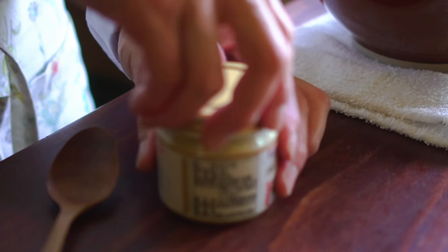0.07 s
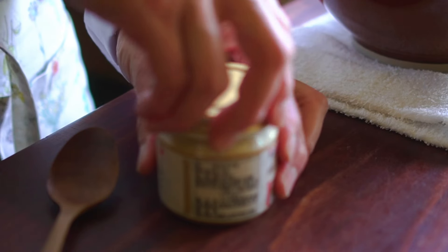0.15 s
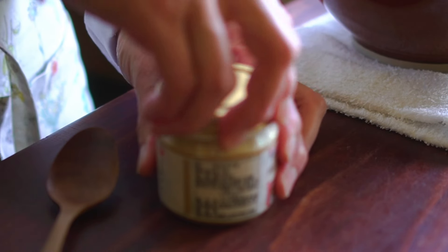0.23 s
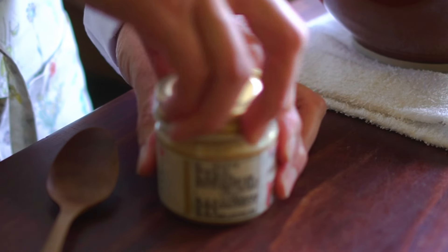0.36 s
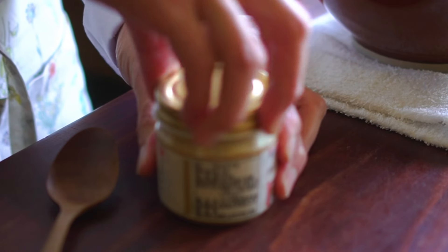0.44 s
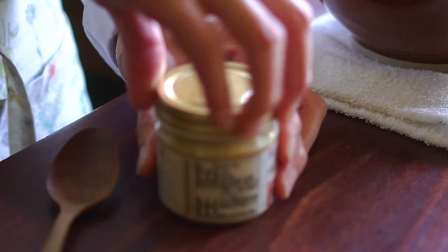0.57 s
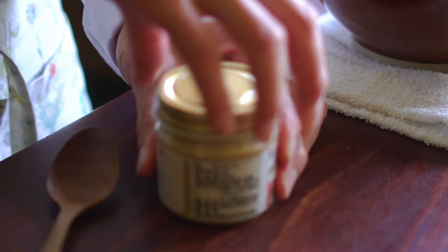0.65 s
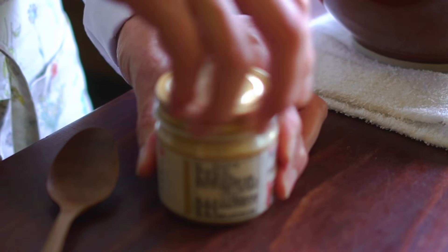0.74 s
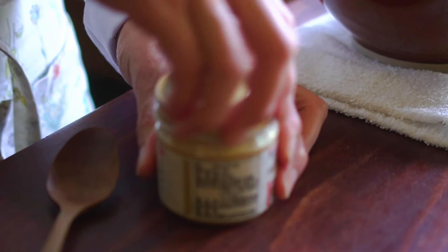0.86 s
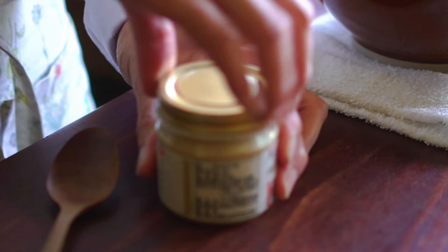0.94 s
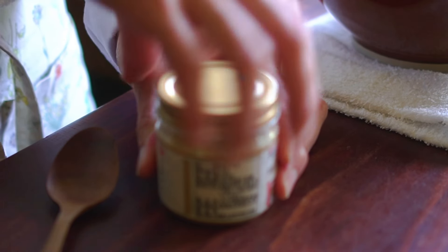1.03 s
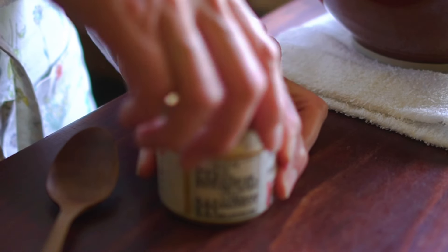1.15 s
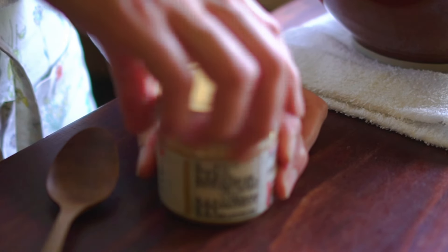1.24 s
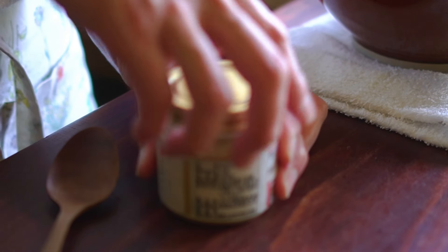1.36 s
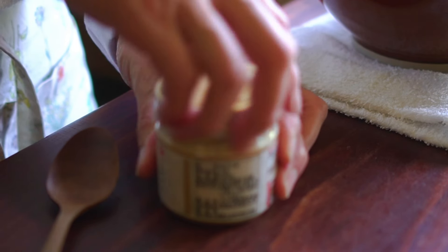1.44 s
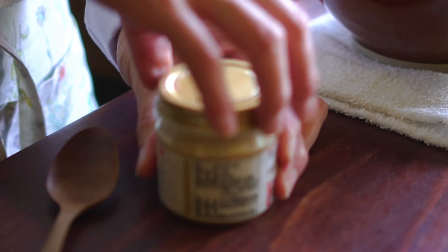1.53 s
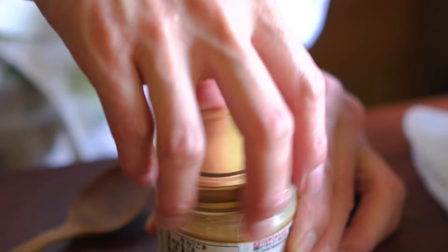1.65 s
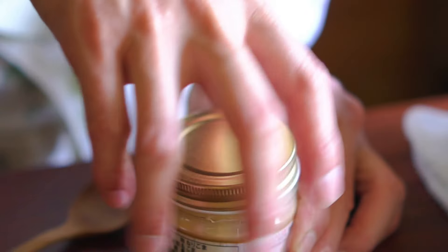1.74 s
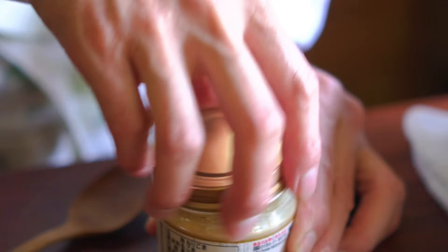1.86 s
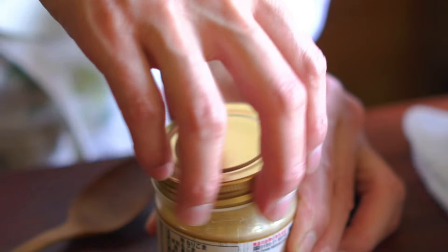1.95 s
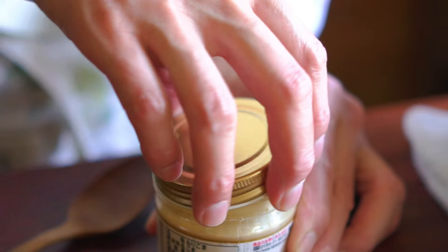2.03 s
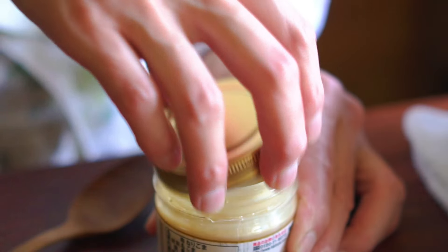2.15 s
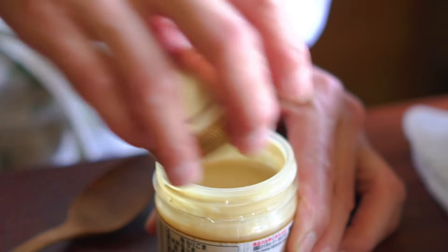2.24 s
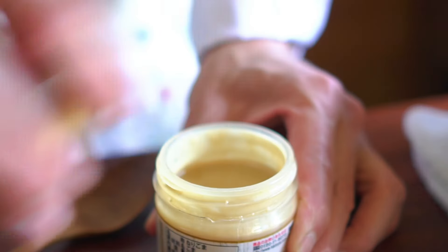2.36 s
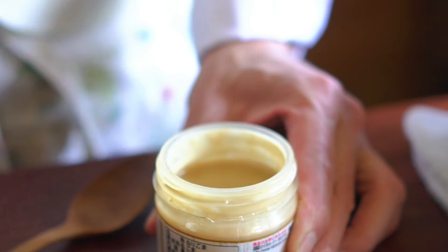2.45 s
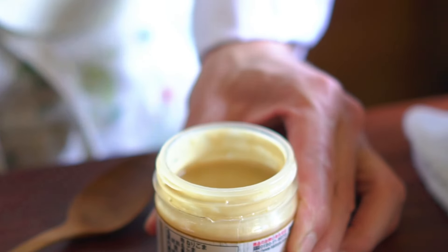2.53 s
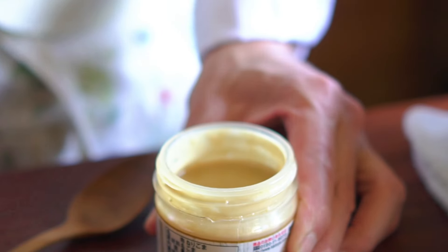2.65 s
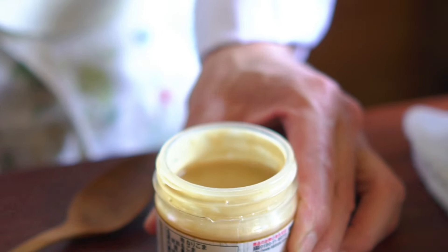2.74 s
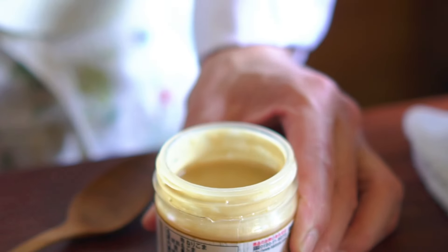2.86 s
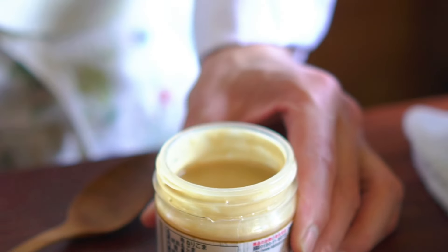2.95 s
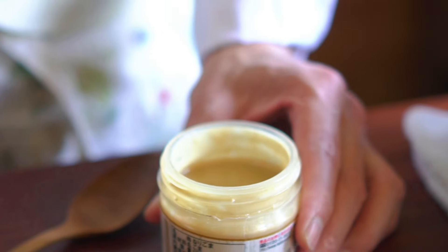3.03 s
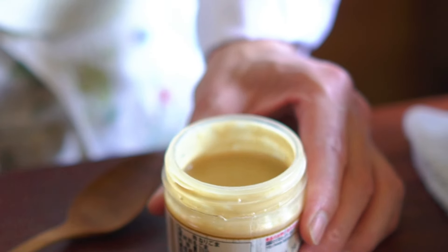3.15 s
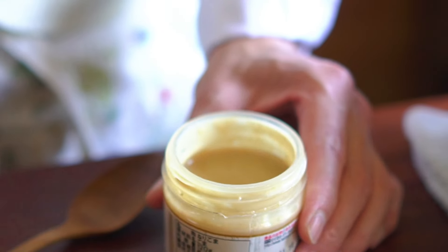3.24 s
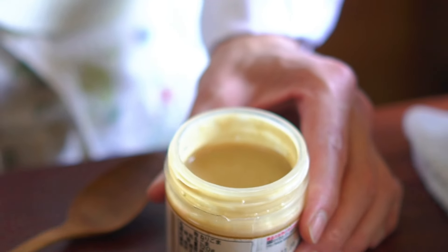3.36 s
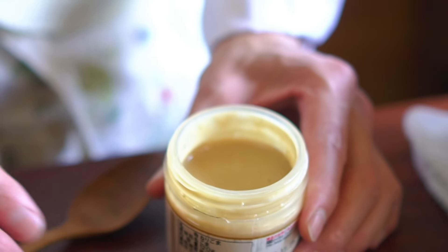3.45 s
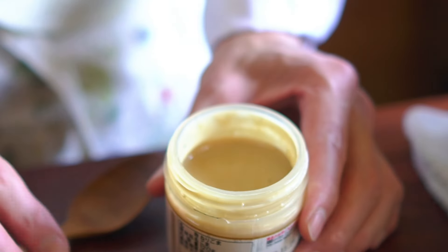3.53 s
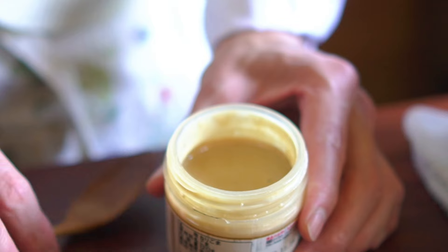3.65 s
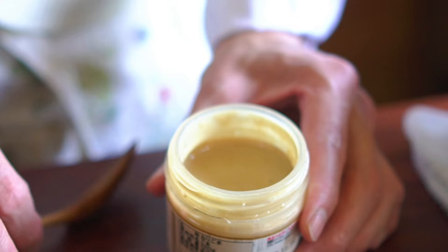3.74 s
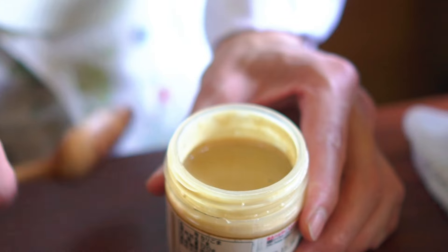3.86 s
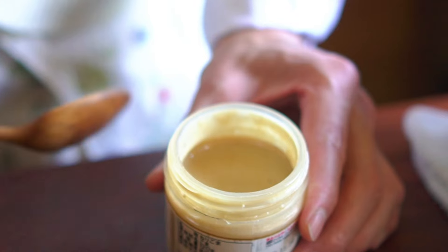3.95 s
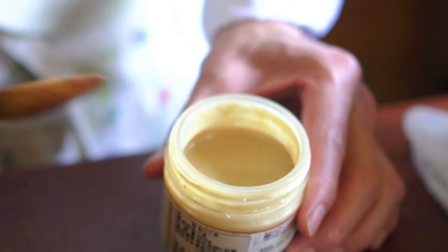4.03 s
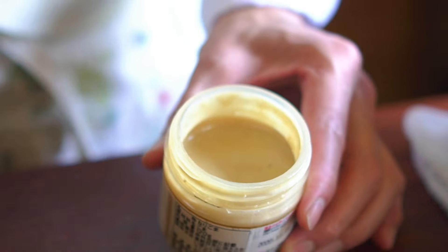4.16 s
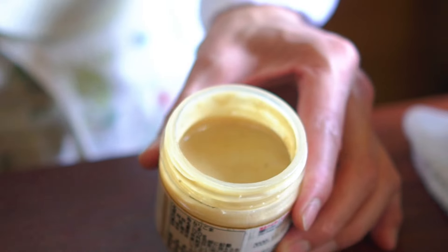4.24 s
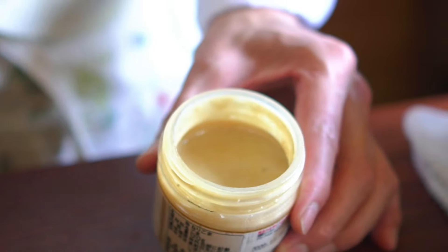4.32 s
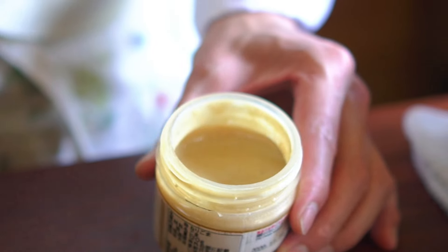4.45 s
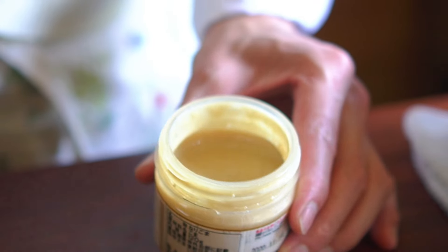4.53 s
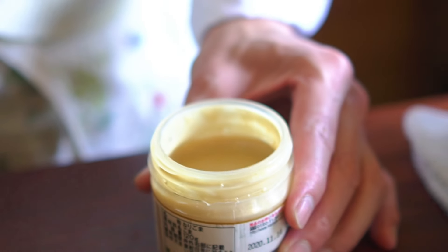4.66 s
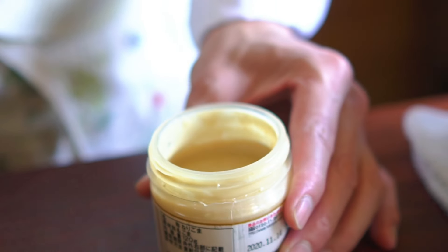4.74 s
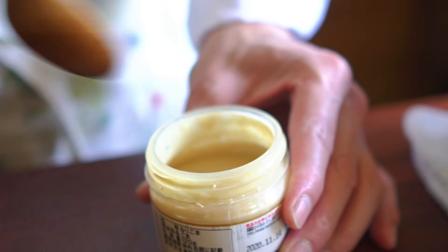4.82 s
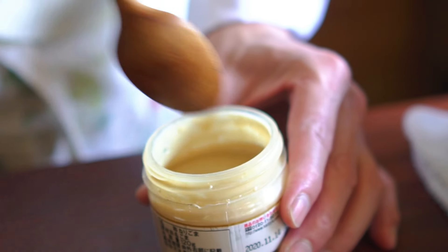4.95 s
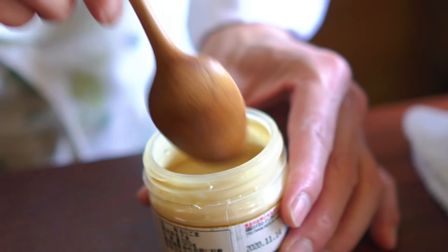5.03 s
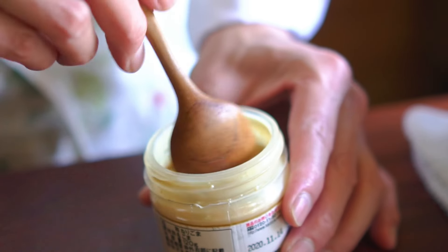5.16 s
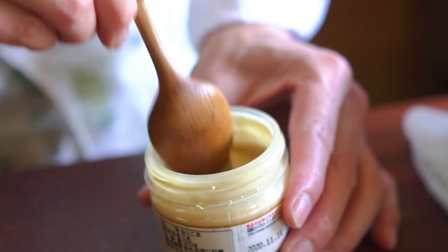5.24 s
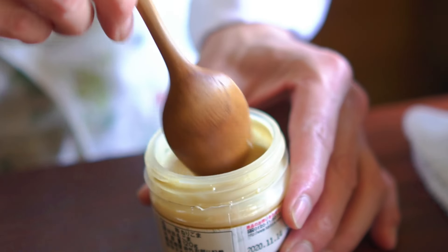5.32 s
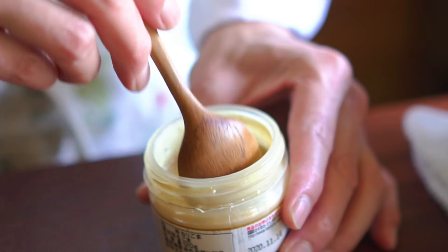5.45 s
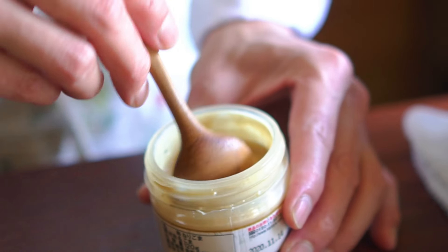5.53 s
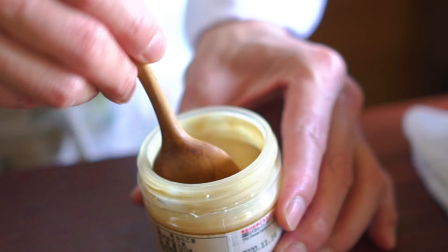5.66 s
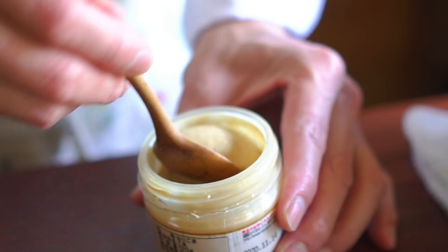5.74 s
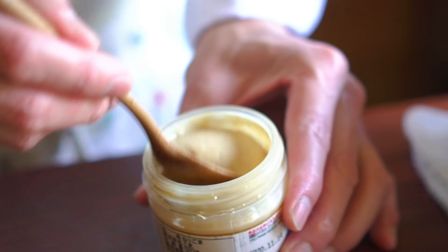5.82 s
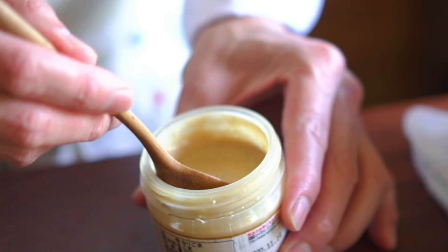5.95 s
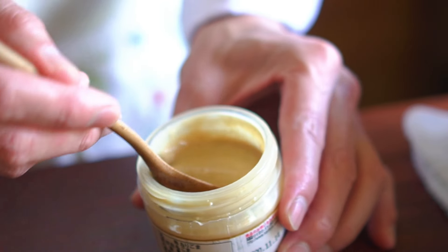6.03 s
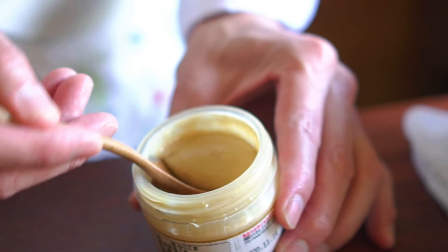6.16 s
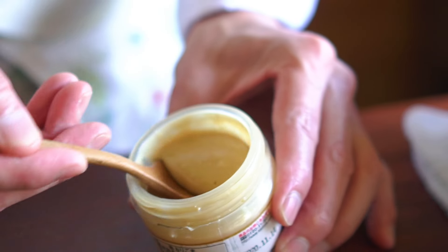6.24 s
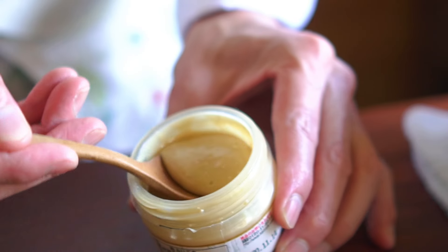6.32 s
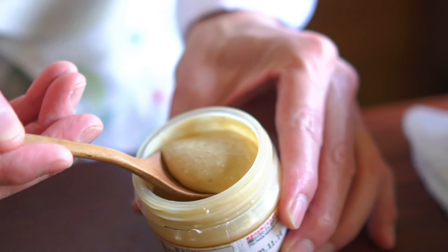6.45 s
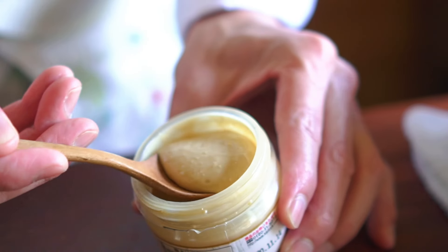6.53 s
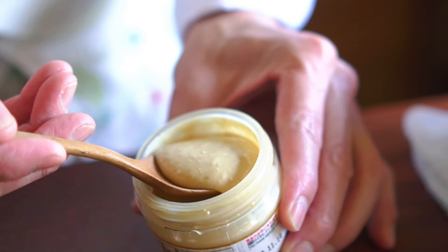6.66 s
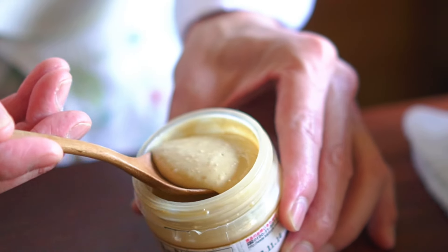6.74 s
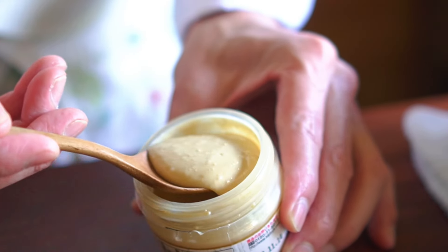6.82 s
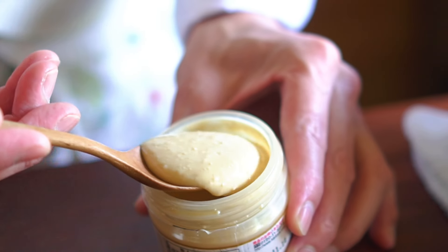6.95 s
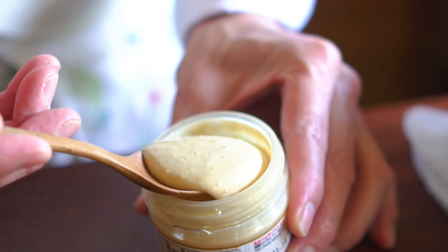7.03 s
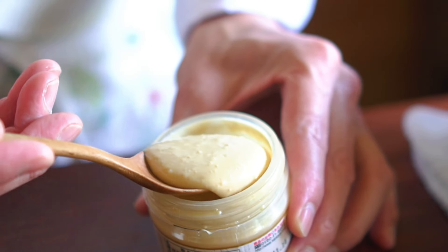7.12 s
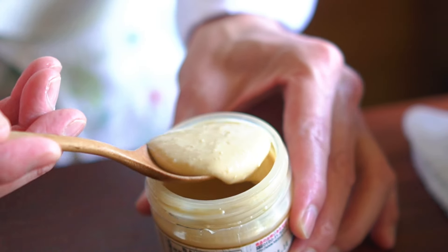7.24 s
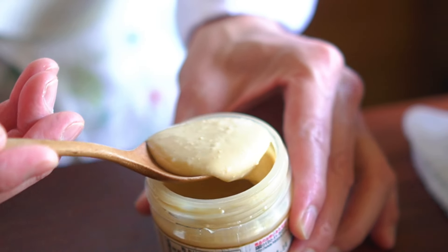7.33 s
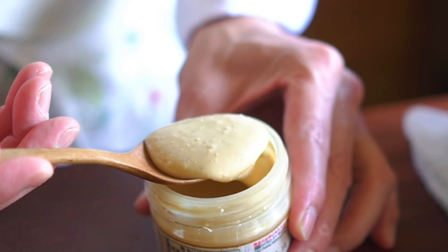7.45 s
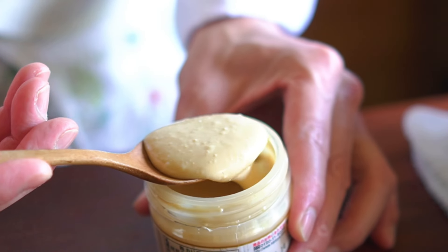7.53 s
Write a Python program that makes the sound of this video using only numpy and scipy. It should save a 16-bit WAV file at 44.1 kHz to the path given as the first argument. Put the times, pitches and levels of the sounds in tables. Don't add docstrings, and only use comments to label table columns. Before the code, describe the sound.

Dry, scratchy lid twisting, a brief gap, a hollow pop, a loud metallic lid drop rattling on the table, then faint wooden spoon rubbing.

```python
import sys
import numpy as np
from scipy import signal
from scipy.fft import rfft, irfft
from scipy.io import wavfile
from scipy.ndimage import uniform_filter1d

SR = 44100
rng = np.random.default_rng(int(sys.argv[2]) if len(sys.argv) > 2 else 0)


def to_linear_factor(level_db):
    exponent = np.asarray(level_db, float) / 20
    return 10 ** exponent


def dump(signal):
    limited = np.clip(np.atleast_2d(signal).T, -1, 1)
    pcm = np.round(limited * 32767).astype(np.int16)
    wavfile.write(sys.argv[1], SR, pcm)


N = 334489
TIME = np.arange(N) / SR

# [f/Hz, density/dB]
AIR_SPECTRUM = [(82, -28.5), (140, -11.5), (208, -3), (249, -1.5), (408, -14.5), (921, -25.5),
                (3550, -40.5), (3920, -37), (4970, -32), (8320, -36), (9750, -31.5), (11700, -36.5),
                (13900, -35.5), (14800, -35), (16000, -63.5)]
AIR_DB = -59.5
# [f/Hz, level/dB]
WHINE_LINES = [(7127, -83), (14250, -84)]
# [f/Hz, t60/s]
KITCHEN_T60 = [(250, 0.37), (660, 0.29), (1740, 0.35), (4600, 0.34), (12000, 0.29)]
# [t opening/s, shut/s, closing time/s,
# level/dB]
HUSHES = [(2.886, 0.11, .025, -10), (.15, .06, 0.097, -1), (.04, .04, .01, -2), (.6, .02, 0.46, 4.5),
          (0.815, .05, 0.2, -43.5), (.88, 0.041, 0.011, -12), (1.116, 0.038, 0.078, -16.5),
          (1.168, 0.033, 0.016, -30.5), (1.66, 0.063, 0.75, 9), (2.059, 0.19, 0.045, -9),
          (3.434, .13, 0.46, -17), (5.45, 0.17, 0.028, -4.5)]
OPEN_DB, REOPEN_S = 5.5, 0.032
RUB_HUSH = 0.48
# [t start/s, t end/s, f low/Hz, f high/Hz, level/dB]
BAND_HOLES = [
    (.73, .817, 886, 3300, -18),
    (0.824, 0.89, 1500, 3300, -16),
    (1.917, 2.064, 1500, 2580, -15),
]
# [t/s, level/dB]
SCENE_CHANGE = [(0, -4.5), (1.661, -2.5), (1.667, -89), (1.74, -73), (1.795, -37), (1.82, -13), (1.855, -1),
                (7.6, 2)]

# [f/Hz, width/Hz, share of clean ringing after a bump]
TABLE_MODES = [(53.37, 30, 1.2), (97.6, 43.2, 0.9)]
# [t peak/s, fall/s, low mode level/dB, upper mode level/dB]
TABLE_BUMPS = [(0.031, .06, -27, -35), (0.184, .1, -19.5, -36), (0.268, .05, -23.5, -42),
               (0.361, .1, -20, -53), (.42, .12, -25, -37.5), (0.588, .18, -32.5, -52.5),
               (0.739, .09, -39, -72), (0.841, .22, -30.5, -48.5), (1.16, .1, -29, -35),
               (1.2, .06, -26, -37), (1.31, .13, -31.5, -60), (1.479, .15, -20, -28),
               (1.665, .15, -25, -48), (1.858, .06, -10.5, -31), (1.889, .09, -11, -25),
               (2.029, .1, -32, -36.5), (2.17, .9, -41.5, -45), (2.8, .12, -36, -44),
               (2.92, .3, -23, -53.5), (3.17, .18, -33, -63.5), (3.589, .1, -27, -55), (3.7, 1.6, -38, -51),
               (6.227, 0.2, -28.5, -40), (6.95, .13, -39, -52), (7.07, .24, -32.5, -37),
               (7.52, .2, -39.5, -45)]
BUMP_RISE = 0.31
# [t/s, low mode level/dB, upper mode level/dB]
IDLE_SHAKING = [(0, -54, -58), (2.199, -54, -51), (3.4, -47, -49), (5.3, -48.5, -48), (7.6, -51, -51)]
# [f/Hz, level/dB, t60 as a share of the knock's]
PLANK_MODES = [(206.8, 2, 1), (234.7, -4, 1.9), (308.2, -2, .9), (395, -3, 0.88), (522, 2, 0.62),
               (636.5, 0.5, 0.61), (768, -6, 0.74), (910, -18, 0.21)]
# [t/s, peak level/dB, f centre/Hz, t60/s, tick level/dB]
WOOD_KNOCKS = [(1.122, -29, 237, 0.13, 1.5), (1.411, -24, 330, 0.14, -9), (1.847, -20.5, 202, 0.29, -5),
               (3.436, -27, 379, 0.24, -2), (3.705, -41.5, 690, 0.31, 0.5), (5.121, -45.5, 650, 0.18, 0.5),
               (6.0793, -36.5, 403, 0.29, 6.5), (6.128, -34.5, 480, 0.3, 4), (7.045, -30, 260, 0.26, 3.5),
               (7.473, -43, 380, 0.15, 5.5)]

# [t peak/s, fall/s, handle level/dB, skin level/dB, bowl level/dB]
SPOON_SLIDES = [(2.33, 0.54, -79, -61.5, -69), (2.438, 0.03, -58, -52.5, -42.5),
                (2.469, 0.096, -66, -76.5, -57), (3.451, 0.67, -80, -78, -68.5),
                (3.714, 0.28, -57, -71, -58.5), (3.785, 0.029, -47, -82, -63),
                (3.93, 0.035, -53.5, -47, -67.5), (3.99, 0.66, -54, -51, -64),
                (4.136, 0.22, -42.5, -39.5, -78), (4.324, 0.071, -52, -49.5, -75),
                (4.44, 0.33, -64.5, -64.5, -72.5), (4.618, 0.15, -45, -43, -68),
                (4.666, 0.0454, -42, -38, -65), (4.753, 0.23, -49.5, -40, -77),
                (4.84, .4, -59, -63.5, -73.5), (4.919, 0.078, -40.5, -30, -76), (4.98, 0.24, -61, -59, -85),
                (5.104, .03, -45, -49, -50), (5.128, 0.023, -40.5, -54, -45),
                (5.138, 0.064, -45.5, -49.5, -49), (4.432, 0.027, -55, -56, -74.5)]
SLIDE_RISE = 0.4
# [f/Hz, width/Hz, level/dB]
HANDLE_BANDS = [(6350, 300, -5.5), (7000, 720, -7.5), (8200, 1400, -0.5), (8340, 960, -3.5)]
SKIN_BANDS = [(10340, 550, -2), (11850, 900, .5), (13300, 2200, 3), (14700, 900, .5)]
BOWL_BANDS = [(2650, 350, -7), (3200, 1400, -2.5), (3530, 500, -6), (4100, 140, -6.5)]
# [t peak/s, rise/s, fall/s, level/dB]
SLEEVE = [
    (5.8, 0.64, 0.99, -62.5),
    (6.14, 0.31, 0.68, -58.5),
    (6.9, .15, 0.11, -58.5),
]
# [t/s, length/s, peak level/dB, f start/Hz, f end/Hz]
SQUEAK_GLIDES = [(3.431, 0.017, -50, 2415, 2390), (3.439, 0.066, -61.5, 2216, 2140),
                 (3.501, 0.075, -64, 2650, 2600), (4.901, 0.077, -47, 14500, 14600),
                 (6.117, 0.022, -58, 1900, 1920), (1.193, 0.1, -54, 2670, 2680),
                 (1.469, 0.11, -51, 2760, 2740), (0.552, 0.18, -44, 4550, 4360),
                 (0.842, 0.068, -44, 4400, 4740), (2.431, 0.044, -53, 2110, 2100),
                 (2.139, .03, -54.5, 4040, 4050), (2.157, .055, -51.5, 3900, 3880),
                 (2.17, 0.054, -58.5, 3000, 3020), (1.327, .022, -53.5, 1900, 1900),
                 (3.687, 0.15, -47.5, 608, 657), (3.698, 0.064, -56, 2020, 1970),
                 (3.692, 0.056, -48.5, 4070, 4200), (3.697, 0.04, -49, 1210, 1200),
                 (3.751, 0.054, -52, 1250, 1290), (3.89, 0.2, -52.5, 6380, 6400),
                 (4.4, 0.67, -70.5, 3540, 3550), (3.897, 0.17, -63, 3500, 3380),
                 (3.935, 0.11, -63, 2770, 2720), (4.074, 0.15, -48.5, 6400, 6130),
                 (4.127, 0.089, -60, 3520, 3570), (4.456, 0.079, -59, 6400, 6310),
                 (4.583, .13, -60, 3550, 3540), (4.77, 0.095, -66, 2270, 2190),
                 (4.904, 0.086, -61, 3620, 3510), (5.12, 0.078, -53, 2650, 2650),
                 (5.866, 0.054, -59.5, 1440, 1476), (6.831, 0.14, -53.5, 8200, 7450)]

# [t/s, peak level/dB]
RIM_TAPS = [
    (0.82, -49),
    (1.634, -37),
    (2.075, -17),
    (2.096, -32),
    (2.148, -26.5),
    (2.183, -42),
]
# [f/Hz, level/dB, t60/s]
MOUTH_MODES = [(718, 5, 0.025), (1038, 1, 0.1), (1113, 21, 0.026), (1183, 0.5, 0.15)]
# [t/s, peak level/dB]
LID_BLOWS = [
    (2.7447, 1),
    (2.8913, 0),
    (2.9607, -2),
    (3.0165, -2),
    (3.0639, -8),
    (3.0984, -9),
    (3.1268, -5),
    (3.1487, -10),
]
# [ring level/dB, snap level/dB]
BLOW_LEVELS = [(-.5, -30), (-9, -1), (-8, 0), (-8, 0), (-3, -2), (-5, -4), (-7, -1), (-3, 0)]
# [f/Hz, level/dB, t60/s]
EDGE_MODES = [(666, -21.5, 0.073), (1250, -14, .06), (1212, -9.5, 0.062), (1400, -10.5, 0.053),
              (2000, -16, 0.06), (2500, -18.5, 0.074), (2580, -12, 0.072), (2630, -11.5, 0.022),
              (2924, 0, 0.055), (2990, -0.5, 0.13), (3700, -17, 0.05), (4000, -14, 0.028),
              (4110, -12, 0.15), (7560, -24, 0.015)]
FLAT_MODES = [(633, -27, .1), (1042, -20, .05), (1215.7, -1, .12), (1380, -19.5, .07), (1761, -21.5, 0.088),
              (2010, -21.5, 0.095), (2340, -24.5, 0.1), (2592, -12, .14), (2930, -8.5, .04),
              (2970, -1, .08), (3380, -26, .12), (3916, -20, .12), (4056, -12, .16), (7060, -27.5, .02)]
# [t/s, peak level/dB, f/Hz, t60/s]
ROCKING_DIPS = [(2.889, -22, 1193, 0.052), (2.895, -25.5, 650, 0.11), (2.9062, -20, 1185, .09),
                (2.9346, -24, 1200, .06), (2.9757, -21, 1182, .09), (2.9831, -21, 1194, 0.071),
                (3.025, -20.5, 1200, 0.083), (3.064, -21.5, 1980, .06), (3.068, -25.5, 1190, .07),
                (3.099, -23.5, 2000, .06), (3.107, -19.5, 1235, .07), (3.1361, -22.5, 1100, 0.068),
                (3.1662, -33.5, 1213, 0.056)]
# (longest free t60/s, ring level/dB, clatter level/dB, t60/s)
LANDING_BUZZ = (.075, -25, -34, 0.4)
# (t from/s, t to/s)
ROLL_SPAN = (2.889, 3.2)
ROLLING_S = 0.045
# [start level/dB, change/(dB/s)]
ROLL_LAYERS = [
    (-23.5, -16.5),
    (-25, -45.5),
    (-45, -6),
    (-37, 12.5),
]
# [t/s, level/dB]
ROLL_WEIGHT = [(2.889, -7), (2.894, 1.5), (2.93, -1), (2.96, -1), (3.0, 1.5), (3.05, -0.5), (3.09, -.5),
               (3.13, -1), (3.168, -1), (3.2, -15)]
# [f/Hz, density/dB]
SNAP_SPECTRUM = [(1000, -26), (3500, 4.5), (5500, 3), (8300, .5), (9500, -12.5), (15000, -22)]
RASP_SPECTRUM = [(820, -43.5), (1400, -7), (2280, -18.5), (2890, 0.5), (3300, -8.5), (4000, -1.5),
                 (4660, -13), (8250, -11), (9320, -24), (12300, -21.5), (16000, -40.5)]
CLATTER_SPECTRUM = [(300, -12), (1000, -7.5), (2500, -0.5), (4200, -4.5), (5600, -28.5), (9000, -50.5)]
DAMPED_S = 0.08

# [t/s, peak level/dB, f centre/Hz]
THREAD_SLIPS = [(0.161, -15, 8130), (0.3039, -11, 8670), (0.3062, 0, 7000), (0.3341, -8, 9500),
                (0.3474, -14, 8050), (0.3805, -13, 5900), (0.3815, -15, 12500), (0.3935, -2, 9230),
                (0.3974, -8, 9730), (0.4105, -5, 11000), (0.4314, -4, 8970), (0.4519, -11, 8740),
                (0.5242, -11, 4600), (0.5564, -13, 5090), (0.5614, -9, 5200), (0.5657, 0, 6200),
                (0.5675, -6, 10500), (0.595, -20, 11000), (0.8215, -29, 9130), (0.944, -19, 8470),
                (1.1209, -37, 2560), (1.2965, -24, 7950), (1.3214, -15, 9500), (1.3349, -15, 8440),
                (1.4187, -27, 5200), (1.4556, -21, 9350), (1.4765, -12, 8880), (1.4923, -10, 8860),
                (1.505, -18, 8500), (1.6362, -37, 7680), (1.8564, -32, 4000), (1.6455, -39, 8000),
                (1.9567, -25, 7180), (1.971, -25, 8000), (1.9777, -20, 12500)]
# [t/s, peak level/dB, f centre/Hz]
LOOSE_TAPS = [(2.4359, -31, 4060), (3.588, -56, 3000), (3.7085, -43, 3000), (3.7673, -42, 9070),
              (5.1008, -46, 6300), (5.1262, -38, 7950), (5.241, -31, 14200), (5.241, -46, 3500)]
# [t peak/s, rise/s, fall/s, rubbing level/dB, grit level/dB]
FINGER_PUSHES = [(.161, 0.0035, 0.16, -36, -44.5), (.25, 0.12, 0.4, -54, -43),
                 (.306, 0.0022, 0.034, -32, -29), (.335, 0.028, 0.67, -32.5, -35),
                 (.42, 0.19, 0.25, -24.5, -36.5), (.52, 0.13, 0.19, -37, -39),
                 (.565, 0.011, 0.067, -19.5, -26.5), (.61, .05, 0.26, -29, -53),
                 (.822, .002, 0.014, -28, -31), (.9, 0.1, 0.13, -37, -45), (.948, 0.091, 0.035, -27, -37),
                 (.98, .04, 0.11, -55, -55), (1.12, 0.0029, 0.025, -41.5, -52.5),
                 (1.245, 0.12, 0.055, -28, -34.5), (1.33, 0.19, 0.062, -37, -50),
                 (1.411, 0.021, 0.23, -40, -53), (1.494, 0.053, 0.074, -18.5, -32),
                 (1.53, .05, 0.06, -46, -41.5), (1.85, 0.011, 0.054, -32, -54),
                 (1.9, 0.053, 0.16, -19.5, -54), (1.985, 0.1, 0.049, -28.5, -50),
                 (2.19, 0.089, 0.12, -56.5, -65)]
# [t peak/s, rise/s, fall/s, level/dB]
JAR_SLIDES = [(.161, .002, 0.21, -52.5), (.37, 0.059, 0.38, -53), (.45, .2, 0.16, -54),
              (.58, .07, 0.018, -47), (.822, .002, 0.033, -36), (.895, 0.04, 0.14, -40),
              (.95, 0.1, 0.091, -37.5), (1.12, .002, .11, -57.5), (1.22, 0.22, 0.18, -41),
              (1.28, 0.16, 0.11, -34.5), (1.411, 0.0035, 0.24, -37), (1.515, 0.035, 0.07, -28.5),
              (1.635, 0.0039, 0.091, -30.5), (1.83, 0.012, 0.072, -38.5), (1.89, 0.21, 0.23, -37),
              (2.15, 0.56, 0.4, -53)]
# [f/Hz, density/dB]
RUB_SPECTRUM = [(2650, -36), (4500, -22.5), (5560, -22.5), (6880, 0), (7330, 1.5), (9070, 2.5),
                (11200, -10), (14500, -7), (16000, -22)]
GRIT_SPECTRUM = [(940, -28.5), (1600, -13.5), (2060, -18.5), (2250, -22), (2900, -11), (3600, -1),
                 (5800, 0.5), (7540, -21.5), (9000, -58.5)]
DRAG_SPECTRUM = [(76, -43), (130, -7), (264, -1), (381, -5), (521, -4), (660, -10), (1000, -17),
                 (1700, -43.5), (2210, -75)]
# [t/s, level of the rubbing above SHEEN_HZ/dB]
GRIP_SHEEN = [(0, -8), (.2, -7), (.3, 3), (.45, 1), (.6, 3), (.75, 4), (.95, 6), (1.1, 5.5), (1.25, 7),
              (1.5, 0), (1.85, -2), (1.93, -4.5), (2., -1.5), (2.06, -19), (2.3, -12)]
SHEEN_HZ = 9800
SPECKS_PER_S, SPECK_DB = 250, 9
SWING_DB = 30


def evened(x):
    return x / np.sqrt(np.mean(x ** 2) + 1e-20)


def read(points, hz):
    f, value = np.transpose(points)
    return np.interp(np.log(hz + 1), np.log(f + 1), value)


def level_at_time(points):
    return to_linear_factor(np.interp(TIME, *np.transpose(points)))


def add(mix, s, sound):
    part = mix[round(s * SR):][:len(sound)]
    part += sound[:len(part)]


def filtered(x, order, hz, kind="low"):
    return signal.sosfilt(signal.butter(order, hz, kind, fs=SR, output="sos"), x)


def filtered_in_phase(x, order, hz, kind="low"):
    return signal.sosfiltfilt(signal.butter(order, hz, kind, fs=SR, output="sos"), x)


def coloured(x, points):
    gain = to_linear_factor(read(points, np.fft.rfftfreq(len(x), 1 / SR)))
    return evened(irfft(rfft(x) * gain, len(x)))


def resonate(x, hz, width):
    turn = np.exp(2j * np.pi * np.cumsum(hz * np.ones(len(x))) / SR)
    r = np.exp(-np.pi * width / SR)
    return 2 * (turn * signal.lfilter([1 - r], [1, -r], x / turn + 1e-18)).real


def resonate_twice(x, hz, width, second_width):
    return resonate(resonate(x, hz, width), hz, second_width)


def bands(x, resonances):
    total = 0
    for hz, w, db in resonances:
        steep = resonate(resonate_twice(x, hz, 2 * w, 2 * w), hz, 3 * w)
        total = total + to_linear_factor(db) * steep / np.sqrt(w)
    return evened(total)


def ring(modes, contact, damped=DAMPED_S):
    t = TIME[:SR // 4]
    out = sum(to_linear_factor(db - 60 * t / min(t60, damped)) * np.sin(2 * np.pi * hz * t) for hz, db, t60 in modes)
    out = out * np.minimum(t / contact, 1) ** 2
    return out / abs(out).max()


def friction(size, patchy_db, flicker_db, hold):
    z = signal.stft(rng.standard_normal(N), nperseg=size)[2]
    patches = rng.standard_normal(z.shape[::-1]).T
    flicker = rng.standard_normal(z.shape[1])
    patches = evened(uniform_filter1d(uniform_filter1d(patches, 5, 0), hold, 1))
    z = z * to_linear_factor(patchy_db * patches + flicker_db * flicker)
    return evened(signal.istft(z, nperseg=size)[1][:N])


def swells(rows, rise_share=None):
    rows, t = np.array(rows), TIME[::20]
    if rise_share:
        rows = np.insert(rows, 1, rise_share * rows[:, 1], axis=1)
    late = t - rows[:, :1]
    rise, fall = abs(rows[:, 1:2]), abs(rows[:, 2:3])
    distance = np.where(late < 0, -late / rise, late / fall)
    shape = to_linear_factor(-SWING_DB * np.minimum(distance, 6))
    power = to_linear_factor(rows[:, 3:]).T ** 2 @ shape ** 2
    return np.array([np.interp(TIME, t, 10 * np.log10(p)) for p in power])


def hush():
    total = 0
    for s, shut, closing, db in HUSHES:
        corners = [s - shut - closing, s - shut, s, s + REOPEN_S]
        total = total + np.interp(TIME, corners, [0, db, db, 0])
    return total


def holes(x):
    for s, end, low_hz, high_hz, db in BAND_HOLES:
        band = filtered_in_phase(x, 4, [low_hz, high_hz], "band")
        corners = [s - .6 * (end - s), s, end, end + .002]
        x = x - band * (1 - to_linear_factor(np.interp(TIME, corners, [0, db, db, 0])))
    return x


def air():
    lines = sum(to_linear_factor(db) * evened(resonate(rng.standard_normal(N), hz, 17)) for hz, db in WHINE_LINES)
    hiss = to_linear_factor(AIR_DB) * coloured(rng.standard_normal(N), AIR_SPECTRUM) + lines
    low = filtered_in_phase(hiss, 2, 350)
    return low + (hiss - low) * to_linear_factor(OPEN_DB + hush())


def kitchen(x):
    taps = np.zeros(SR // 2)
    at = np.arange(200, SR // 2 - 20, 20)
    taps[at + rng.integers(0, 20, len(at))] = rng.choice([-1., 1.], len(at))
    hz, t, z = signal.stft(taps, SR, nperseg=256)
    decay = to_linear_factor(-60 * t / read(KITCHEN_T60, hz)[:, None])
    tail = signal.istft(z * decay, SR, nperseg=256)[1]
    return signal.oaconvolve(x, tail / np.linalg.norm(tail))[:N]


def table():
    s, *rest = np.transpose(IDLE_SHAKING)
    out = np.zeros(N)
    for bump_db, rest_db, (hz, w, clean) in zip(swells(TABLE_BUMPS, BUMP_RISE), rest, TABLE_MODES):
        shaking = evened(resonate_twice(rng.standard_normal(N), hz, w, 2 * w))
        ringing = clean * np.sin(2 * np.pi * hz * TIME) + (1 - clean / 2) * shaking
        out += to_linear_factor(bump_db) * ringing + to_linear_factor(np.interp(TIME, s, rest_db)) * shaking
    return out


def knocks():
    out, t = np.zeros(N), TIME[:SR // 3]
    for s, db, hz, t60, tick_db in WOOD_KNOCKS:
        noise = rng.standard_normal(len(t))
        modes = 0
        for f, top_db, share in PLANK_MODES:
            spot = rng.standard_normal()
            mode_db = top_db + 2 * spot - 8.8 * abs(np.log2(f / hz))
            tone = np.sin(2 * np.pi * f * (1 + .02 * spot) * t)
            modes = modes + to_linear_factor(mode_db - 60 * t / (share * t60)) * tone
        rattle = filtered(resonate(noise, hz, 0.65 * hz) * to_linear_factor(-60 * t / t60), 5, [140, 1150], "band")
        tick = resonate(resonate(noise * np.exp(-t / 0.0089), 720, 600), 800, 900)
        thud = 0.72 * modes + 3.0 * rattle + to_linear_factor(tick_db + 2) * tick
        thud = filtered(thud * np.minimum(t / .001, 1), 6, 1150)
        add(out, s, to_linear_factor(db) * thud / abs(thud).max())
    return out


def squeaks():
    out = np.zeros(N)
    for s, length, db, start_hz, end_hz in SQUEAK_GLIDES:
        n = round(length * SR)
        glide = np.linspace(start_hz, end_hz, n)
        tone = evened(resonate(rng.standard_normal(n), glide, max(0.026 * start_hz, 110)))
        add(out, s, to_linear_factor(db) * np.hanning(n) ** 2 * tone)
    return out


def spoon():
    force = friction(256, 2.5, 2., 8)
    parts = (HANDLE_BANDS, SKIN_BANDS, BOWL_BANDS)
    out = sum(to_linear_factor(db) * bands(force, part) for db, part in zip(swells(SPOON_SLIDES, SLIDE_RISE), parts))
    out = filtered(out, 2, 1300, "high")
    sleeve = to_linear_factor(swells(SLEEVE)[0]) * friction(256, 1.6, 2.9, 4)
    return out + sleeve + squeaks()


def lid_blows():
    out, t = np.zeros(N), TIME[:900]
    for s, db in RIM_TAPS:
        add(out, s, to_linear_factor(db) * ring(MOUTH_MODES, 0.0045))
    for (s, db), (ring_db, snap_db) in zip(LID_BLOWS, BLOW_LEVELS):
        noise = rng.standard_normal(len(t))
        if s > ROLL_SPAN[0]:
            spot = rng.standard_normal(len(EDGE_MODES))
            ringing = ring(np.array(EDGE_MODES) + np.outer(2 * spot, [0, 1, 0]), 0.002)
        else:
            ringing = ring(FLAT_MODES, 0.0019, LANDING_BUZZ[0])
        snap = coloured(noise, SNAP_SPECTRUM) * t * (np.exp(-t / .00045) + .05 * np.exp(-t / .003))
        clatter = coloured(noise, CLATTER_SPECTRUM) * (np.exp(-t / 0.0049) + 0.055)
        add(out, s - .0005, to_linear_factor(db + ring_db) * ringing)
        add(out, s + .001, to_linear_factor(db + snap_db) * snap / abs(snap).max())
        add(out, s, to_linear_factor(db + .6 * snap_db - 14.5) * clatter * np.minimum(t / 0.00081, 1))
    for s, db, hz, t60 in ROCKING_DIPS:
        add(out, s, to_linear_factor(db) * ring([(hz, 0, t60)], .004, t60))
    return out


def lid_buzz():
    out = np.zeros(N)
    _, ring_db, clatter_db, t60 = LANDING_BUZZ
    force = friction(128, 3., 3., 2)[:SR // 7]
    ringing = evened(signal.oaconvolve(force, ring(FLAT_MODES, 0.00043, .05))[:len(force)])
    buzz = to_linear_factor(ring_db) * ringing + to_linear_factor(clatter_db) * coloured(force, CLATTER_SPECTRUM)
    add(out, LID_BLOWS[0][0], buzz * to_linear_factor(-60 * TIME[:len(buzz)] / t60))
    return out


def lid_rolling():
    start, end = ROLL_SPAN
    rolling = (TIME > start) & (TIME < end)
    ring_db, rasp_db, table_db, clatter_db = (
        np.where(rolling, db + slope_db * (TIME - start), -150) for db, slope_db in ROLL_LAYERS)
    force = friction(128, 3., 3., 2) * level_at_time(ROLL_WEIGHT)
    ringing = evened(signal.oaconvolve(force, ring(EDGE_MODES, 0.00037, ROLLING_S))[:N])
    out = to_linear_factor(ring_db - 8.5) * ringing
    out += to_linear_factor(rasp_db - 3) * coloured(force, RASP_SPECTRUM)
    out += to_linear_factor(table_db - 9.0) * coloured(force, DRAG_SPECTRUM)
    return out + to_linear_factor(clatter_db - 3.5) * coloured(force, CLATTER_SPECTRUM)


def slips():
    out, t = np.zeros(N), TIME[:400]
    shape = (t / .0009) ** 3 * np.exp(3 - 3 * t / .0009) + .07 * np.exp(-abs(t - .001) / .002)
    for s, db, hz in THREAD_SLIPS + LOOSE_TAPS:
        pitched, plain = rng.standard_normal((2, 400))
        plain_share = np.clip(hz / 9000 - .3, .05, .7)
        burst = shape * (evened(resonate_twice(pitched, hz, 3500, 3500)) + plain_share * plain)
        snap = filtered(burst, 6, max(.62 * hz, min(hz, 3500)), "high")
        add(out, s - .0003, to_linear_factor(db + 2.5) * snap / abs(snap).max())
    return out


def strokes():
    (rub_db, grit_db), (drag_db,) = swells(FINGER_PUSHES), swells(JAR_SLIDES)
    force = friction(128, 3., 2., 2)
    specks = (rng.random(N) < SPECKS_PER_S / SR) * rng.standard_normal(N) * to_linear_factor(SPECK_DB)
    force = force + signal.oaconvolve(specks, np.hanning(24) * rng.standard_normal(24))[:N]
    rub = coloured(force, RUB_SPECTRUM)
    body = filtered_in_phase(rub, 4, SHEEN_HZ)
    rub = body + level_at_time(GRIP_SHEEN) * (rub - body)
    mouth_hum = evened(resonate_twice(force, 1160, 200, 300))
    drag = coloured(force, DRAG_SPECTRUM) + to_linear_factor(-14) * mouth_hum
    return to_linear_factor(rub_db) * rub + to_linear_factor(grit_db) * coloured(force, GRIT_SPECTRUM) + to_linear_factor(drag_db) * drag


def scene():
    closing = np.minimum(hush(), 0)
    sharp = slips()
    metal = lid_blows() + lid_buzz() + lid_rolling()
    soft = strokes() * to_linear_factor(RUB_HUSH * closing) + spoon() + knocks()
    wet = kitchen(to_linear_factor(-10.0) * sharp + to_linear_factor(-8.5) * metal + to_linear_factor(-12.5) * soft)
    dull = filtered_in_phase(wet, 4, 5200)
    wet = dull + (wet - dull) * to_linear_factor(0.54 * closing)
    return holes(sharp + metal + soft + wet + table() + air())[None]


def band_limit(x):
    return signal.sosfilt(signal.butter(12, 16410, fs=SR, output="sos"), x)


def record(dry):
    faded = dry * level_at_time(SCENE_CHANGE)
    dulled = signal.oaconvolve(faded, signal.firwin(201, 15200, fs=SR)[None], "same")
    mix = np.clip(dulled + to_linear_factor(-25) * (faded - dulled), -1, 1)
    return band_limit(mix)


dry = scene()
out = record(dry)
dump(out)
```